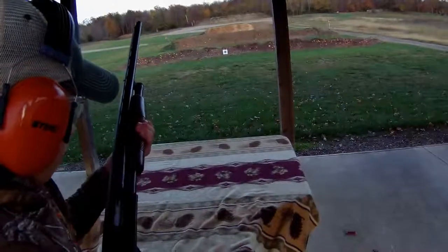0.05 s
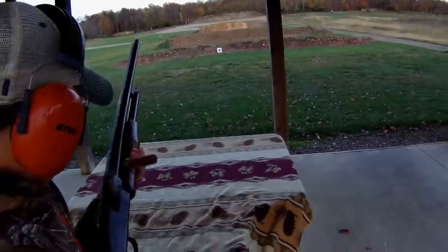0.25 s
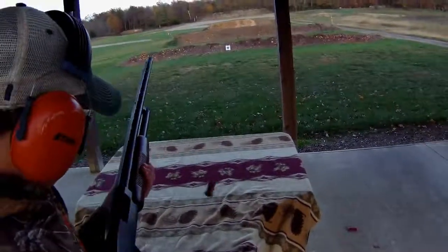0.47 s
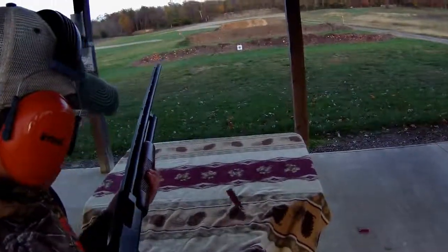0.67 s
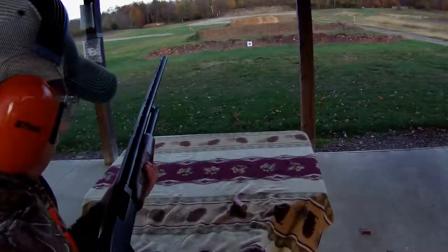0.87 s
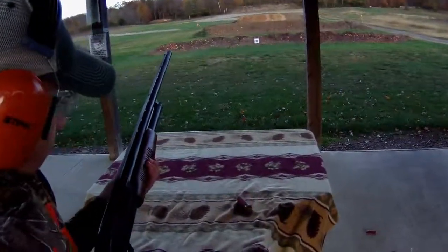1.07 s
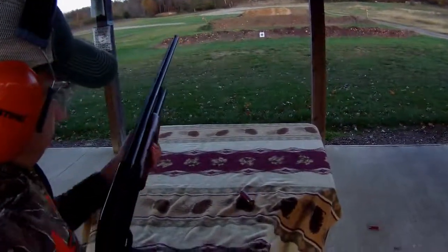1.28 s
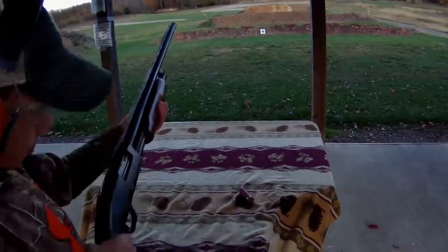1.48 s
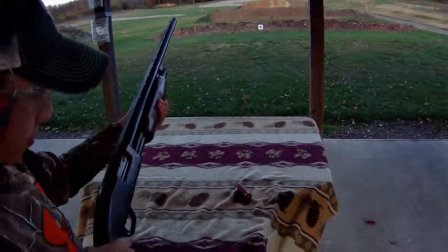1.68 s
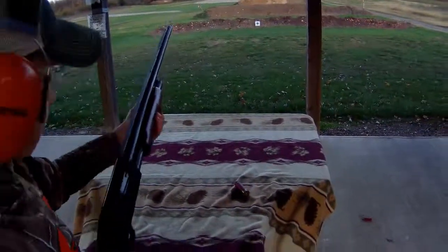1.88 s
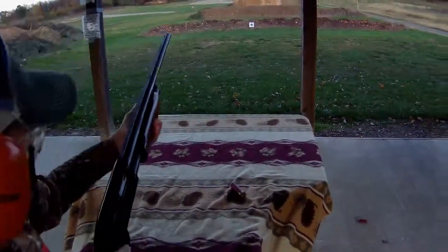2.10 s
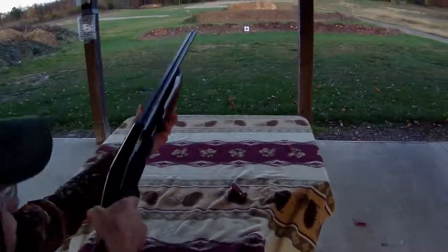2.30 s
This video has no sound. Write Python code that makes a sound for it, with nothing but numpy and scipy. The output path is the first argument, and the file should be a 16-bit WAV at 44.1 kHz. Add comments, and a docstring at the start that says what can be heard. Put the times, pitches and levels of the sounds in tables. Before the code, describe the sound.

A pump shotgun is racked open close by, with a steel scrape and ringing clacks at about 0.25 seconds. The spent shell thuds softly on a cloth-covered table at 0.4, then bounces with hollow plastic clicks at 0.6 and 0.85. After a quiet pause, the action slams shut at 1.5 seconds. Right after, a dull boom, perhaps a distant shot, rolls away in uneven echoes until about 2.3.

```python
"""Under the roof of an outdoor range, in quiet air, a pump shotgun is racked open: steel scrapes,
knocks and rings, and the stock thumps. The spent shell thuds on a cloth-covered table, then a hollow
plastic hull bounces twice with a click and a pop. At 1.5 s the action slams shut. Just after, a dull
boom, perhaps a far shot, reaches the microphone, rings the shelter and rolls away in uneven echoes."""
import sys
import numpy as np
from scipy import signal
from scipy.fft import rfft, irfft
from scipy.io import wavfile

SR = 44100
rng = np.random.default_rng(int(sys.argv[2]) if len(sys.argv) > 2 else 0)


def unload_audio(sound):
    """Save the sound as a 16-bit wav file, at the path given as the first command line argument."""
    columns = np.transpose(np.atleast_2d(sound))
    # keep every value between -1 and 1, then stretch to whole-number steps
    steps = np.round(np.clip(columns, -1, 1) * 32767)
    wavfile.write(sys.argv[1], SR, steps.astype(np.int16))


N = 108045

# Tone colours. Each row: frequency in Hz, relative level in dB.
AIR_COLOUR = [(25, -5.5), (45, 1), (85, 1), (130, -9.5), (220, -8), (400, -12.5), (650, -15.5),
              (1100, -18.5), (1700, -30), (3200, -35), (6300, -39), (15000, -41.5)]
PULSE_COLOUR = [(30, -13.5), (100, -21), (180, 0), (500, -2.5), (1000, -4), (2000, -31), (5000, -32),
                (16000, -67.5)]
RUMBLE_COLOUR = [(30, -54), (70, -24.5), (120, -7.5), (175, -5), (280, 1.5), (400, 1), (600, -1.5),
                 (900, -9.5), (1200, -18.5), (2000, -31.5), (5000, -65)]
RUMBLE_TREBLE_COLOUR = [(200, -13.5), (700, 8), (1350, 4), (2000, -7), (2700, -10.5), (3600, -8.5),
                        (5200, -28.5), (7000, -29.5), (9500, -33.5), (13000, -44.5), (16000, -42.5)]
RUMBLE_BASS_COLOUR = [(40, -26), (85, -10), (130, -12), (185, 2), (215, -3), (300, -6), (450, -11.5),
                      (1000, -36), (3000, -61)]
RASP_COLOUR = [(400, -26), (900, 12), (1350, 8.5), (1800, -7), (2400, -5.5), (3000, -31), (8000, -54)]
CLOTH_COLOUR = [(40, -31), (100, -10.5), (150, 1), (210, -2.5), (380, -3), (550, -10.5), (800, -15),
                (1500, -30), (4000, -49.5)]
HULL_CLICK_COLOUR = [(300, -39), (1500, 14), (2500, -2), (3600, 7), (4300, 0), (5500, -12.5), (6400, -5),
                     (8300, -27), (10000, -44.5), (16000, -50)]
SIZZLE_COLOUR = [(3000, -30), (7000, -7.5), (9500, 1), (11500, -4), (13300, 1.5), (16000, -6)]
SLIDE_COLOUR = [(200, -11.5), (700, 9), (1500, 7), (2500, -0.5), (3600, 1), (5000, -10.5), (6700, -11.5),
                (9000, -28), (13500, -36), (16000, -31.5)]
KNOCK_COLOUR = [(100, -25.5), (300, -15.5), (480, -3), (1000, -4), (1900, -1), (2600, -16), (6000, -35),
                (16000, -57)]
RING_COLOUR = [(200, -25), (900, -4), (1800, 2), (2500, 3), (3400, 5.5), (4500, -13), (8000, -24.5),
               (16000, -29.5)]
TICK_COLOUR = [(500, -23), (2500, -1.5), (4000, 0), (5500, -4), (6600, 2.5), (7800, -0.5), (9200, -27),
               (13300, -22), (16000, -32.5)]
# The clacks with their bass and highest treble turned down. Each row: frequency in Hz, gain in dB.
GUN_TONE = [(60, -24), (200, -20), (420, -4.5), (8000, 0), (9500, -13), (16000, -17)]

# Swells and fades. Each row: time in seconds, level in dB.
RUMBLE_LEVEL = [(1.508, -43), (1.518, -21.5), (1.55, -23.5), (1.6, -30), (1.71, -33), (1.74, -27.5),
                (1.79, -27.5), (1.835, -39), (1.86, -31), (1.94, -26), (2.03, -30.5), (2.055, -24),
                (2.1, -30), (2.2, -34.5), (2.3, -50.5), (2.45, -70)]
RUMBLE_TREBLE_LEVEL = [(1.5, -46), (1.53, -29), (1.62, -53.5), (1.718, -46), (1.724, -25), (1.752, -28),
                       (1.762, -33.5), (1.847, -51), (1.853, -38.5), (1.87, -43), (1.92, -47),
                       (2.033, -56.5), (2.041, -34), (2.1, -43.5), (2.22, -62), (2.25, -62), (2.3, -59.5),
                       (2.45, -63)]
RUMBLE_BASS_LEVEL = [(1.52, -48), (1.66, -35), (1.8, -35), (1.95, -40), (2.12, -36.5), (2.19, -31.5),
                     (2.3, -40), (2.45, -62)]
RASP_LEVEL = [(1.91, -68), (1.933, -32.5), (1.955, -36.5), (1.99, -48), (2.03, -79)]
CLOTH_LEVEL = [(0, -55), (.1, -57.5), (.2, -47.5), (.385, -51), (.395, -45.5), (.415, -36.5), (.435, -36),
               (.47, -42), (.53, -45.5), (.55, -53.5), (.7, -72.5), (1.26, -77), (1.288, -48),
               (1.35, -44.5), (1.39, -48), (1.48, -56), (1.55, -68)]
SLIDE_LEVEL = [(0, -67), (.13, -66.5), (.16, -43), (.18, -48), (.215, -38.5), (.25, -31.5), (.29, -36.5),
               (.33, -55.5), (.5, -67.5), (1.3, -90.5), (1.37, -52), (1.42, -45), (1.46, -42), (1.5, -31),
               (1.56, -64.5)]

# Resonances. Each row: frequency in Hz, relative level in dB, t60 in seconds.
SHELTER_MODES = [(178, -2, 0.39), (262, -3, 0.22), (296, -4, 0.25), (364, -6, 0.2), (400, -1.5, .15),
                 (478, -4, 0.16), (753, -1, .22), (834, -3, 0.18)]
HULL_MODES = [(577.7, -24.5, 0.27), (1061, -26, 0.5), (1255, 2, .03), (1190, -29, 0.15), (1440, -11, .025)]
STOCK_MODES = [(212, -3.5, .14), (335, -1.5, .045)]
SMALL_PART_MODES = [(4520, -8.5, 0.025), (5960, -4.5, 0.013), (6380, -4, .045), (6640, -1.5, 0.04),
                    (6800, 0, 0.022), (7300, -11, 0.013)]
# Receiver and barrel. Each row: frequency in Hz, level in dB with the breech open, level in dB
# with it shut, t60 in seconds.
STEEL_MODES = [(410, -14, -20, 0.046), (540, -5.5, -23, .08), (756, -17.5, -23.5, 0.021),
               (960, -9, -20.5, 0.045), (1232, -7.5, -16, 0.07), (1290, -4, -7.5, 0.12),
               (1506, -7.5, -24, .1), (1578, -18, -7, 0.083), (1634, -11, -24, 0.1), (1933, -6, -9, 0.062),
               (2054, -4, -11.5, 0.08), (2322, -20.5, -6, 0.035), (2925, -8.5, -3.5, .045),
               (3073, -9.5, -2.5, 0.067), (3240, -11.5, -18, 0.1), (3416, -10.5, -4, 0.06),
               (3650, -10.5, -10, 0.05)]
# Reverberation under the roof. Each row: band centre in Hz, level in dB, t60 in seconds.
ROOF_BANDS = [(149, -7.5, .6), (500, -8, 0.3), (1290, -16, 0.14), (2400, -13, 0.12), (3480, -6.5, 0.2),
              (6500, -12.5, 0.21), (8700, -7.5, 0.17), (14000, -7, 0.2)]

# The boom and its clearest echoes. Each row: start in seconds, level in dB, length in seconds.
BOOM_PULSES = [(1.5087, -4.5, 0.0024), (1.5171, -6.5, 0.0022), (1.5212, -11, 0.00095),
               (1.5259, -9.5, 0.0019), (1.5393, -9.5, 0.00173), (1.5485, -8, 0.0012),
               (1.5564, -9.5, 0.0013), (1.5642, -11.5, .0014), (1.588, -13.5, 0.0021),
               (1.734, -6.5, 0.0016), (1.8536, -13, 0.0025), (2.038, -8.5, 0.00283), (2.057, -8.5, 0.0025)]
# The hull landing. Each row: start in seconds, pop level in dB, click level in dB.
HULL_BOUNCES = [(0.6308, -23.5, -24), (.636, -38, -45), (0.6453, -62, -44), (.8552, -31, -47)]
# Bursts of fine, bright hiss. Each row: start in seconds, level in dB, t60 in seconds.
SIZZLE_BURSTS = [(0.247, -43, 0.31), (.2705, -35.5, .03), (.413, -60, 0.024), (.4215, -57, .03),
                 (1.364, -60, 0.014), (1.3748, -57, 0.033), (1.384, -51, 0.03), (1.493, -41.5, .17),
                 (2.246, -60, .05)]
# The fore-end hitting its stops. Each row: start in seconds, level in dB.
FORE_END_STOPS = [(0.2428, -33), (1.4883, -25)]
# Contacts in the action. Each row: start in seconds, knock pitch in Hz, then the levels in dB
# of the body's knock, the steel's ring and the bright tick.
CONTACTS = [(0.0375, 1080, -43, -45, -54), (.078, 1070, -50, -63.5, -69), (0.1448, 1430, -34, -38, -38.5),
            (.1552, 1380, -32.5, -27.5, -22), (0.19, 1350, -36, -34, -35),
            (0.2024, 1070, -21, -23.5, -26.5), (0.2288, 1140, -14.5, -17.5, -1),
            (.2318, 1350, -4.5, -19, -18), (0.2351, 1047, -1, -5.5, -35), (0.2366, 1204, -12, -17, -6),
            (.2432, 1190, -15, -18.5, -18), (.2615, 1400, -23.5, -21.5, -31),
            (.2705, 850, -32.5, -24.5, -25), (0.2766, 1420, -25, -14, -32), (.2935, 1480, -32, -50, -50),
            (0.3, 1700, -25, -53, -50), (.339, 1400, -37, -37, -50), (0.3615, 1410, -41, -52, -44),
            (0.3914, 1040, -38.5, -50.5, -53), (.413, 1346, -38, -43, -45.5), (0.4207, 1447, -46, -34, -42),
            (1.3437, 1390, -50, -53, -60), (1.3633, 1395, -48.5, -42.5, -43.5),
            (1.3748, 1400, -50, -40, -43), (1.3795, 1400, -39.5, -36.5, -46), (1.4137, 1450, -31, -22, -30),
            (1.4728, 1390, -28, -13.5, -17), (1.4833, 1335, -7, -16, -22), (1.4883, 1309, -6, -2.5, -11),
            (1.4908, 1670, -26, -14, -14), (1.502, 1330, -30, -23.5, -35), (2.238, 1410, -63, -37, -54.5),
            (2.246, 1390, -50, -31, -42.5), (2.254, 1415, -51, -48, -51)]


def amp(db):
    """Decibels to gain."""
    return 10 ** (np.asarray(db) / 20)


def unit(x):
    """Scale to rms 1."""
    return x / np.sqrt(np.mean(x ** 2))


def clock():
    """Time of every sample."""
    return np.arange(N) / SR


def fade(t60):
    """Exponential decay."""
    return np.exp(-np.log(1000) * clock() / max(t60, 1 / SR))


def curve(points):
    """Gain over time from (s, dB) points, silent outside them."""
    return amp(np.interp(clock(), *np.array(points).T, left=-np.inf, right=-np.inf))


def through(x, response):
    """Sound passed through an impulse response."""
    return signal.fftconvolve(x, response)[:N]


def colour(x, points, size=4096):
    """Causal filter with the given (Hz, dB) shape."""
    hz, db = np.array(points)[:, :2].T
    bins = np.maximum(np.arange(size // 2 + 1), 1) * SR / size
    cep = irfft(np.log(amp(np.interp(np.log(bins), np.log(hz), db))))
    cep[1:size // 2] *= 2
    cep[size // 2 + 1:] = 0
    return through(x, irfft(np.exp(rfft(cep))))


def noise(points):
    """Coloured noise of rms 1."""
    return unit(colour(rng.standard_normal(N), points))


def grains(per_s, spread_db):
    """Random clicks of uneven size."""
    return (rng.random(N) < per_s / SR) * rng.choice([-1, 1], N) * amp(spread_db * rng.standard_normal(N))


def ring(modes, size=N):
    """Sum of damped modes, neighbours in opposite phase."""
    t = clock()[:size]
    return sum((-1) ** k * amp(db) * np.exp(-np.log(1000) * t / t60) * np.sin(2 * np.pi * hz * t)
               for k, (hz, db, t60) in enumerate(modes))


def add(out, at, x):
    """Mix a sound in at a time."""
    i = max(int(at * SR), 0)
    n = min(len(x), N - i)
    out[i:i + n] += x[:n]


def open_air():
    """Quiet air around the microphone, mostly bass."""
    return amp(-56.5) * noise(AIR_COLOUR)


def roof(sound, delay_s=.003, build_s=.005):
    """Close reflections from roof, posts and slab, each band dying at its own rate."""
    centres = np.array(ROOF_BANDS)[:, 0]
    spectrum = rfft(unit(grains(per_s=6200, spread_db=4.5)))
    log_hz = np.log(np.maximum(np.arange(len(spectrum)), 1) * SR / N)
    tail = 0
    for share, (_, db, t60) in zip(np.eye(len(centres)), ROOF_BANDS):
        band = irfft(spectrum * np.interp(log_hz, np.log(centres), share), N)
        equal_energy = np.sqrt(2 * np.log(1000) / (t60 * SR))
        tail = tail + amp(db) * band * fade(t60) * equal_energy
    onset = np.clip((clock() - delay_s) / build_s, 0, 1)
    return through(sound, tail * onset)


def boom():
    """From far off, N-shaped pressure pulses and a swarm of scattered echoes ring the shelter."""
    pulses = np.zeros(N)
    for at, db, length in BOOM_PULSES:
        add(pulses, at, amp(db) * np.linspace(1, -1, max(int(length * SR), 2)))
    echoes = unit(colour(grains(per_s=1500, spread_db=1.5), RUMBLE_COLOUR))
    low = colour(pulses, PULSE_COLOUR) + curve(RUMBLE_LEVEL) * echoes
    shelter = amp(-57.5) * through(low, ring(SHELTER_MODES))
    bright_echoes = unit(colour(grains(per_s=4000, spread_db=-2.0), RUMBLE_TREBLE_COLOUR))
    treble = curve(RUMBLE_TREBLE_LEVEL) * bright_echoes
    lingering_bass = curve(RUMBLE_BASS_LEVEL) * noise(RUMBLE_BASS_COLOUR)
    return low + shelter + treble + lingering_bass


def rasp():
    """A short, grainy swell in the middle of the rumble."""
    return curve(RASP_LEVEL) * unit(colour(grains(per_s=3500, spread_db=4.0), RASP_COLOUR))


def cloth():
    """Muffled patter of the shell on the covered table and of hands on the gun."""
    return curve(CLOTH_LEVEL) * unit(colour(grains(per_s=2500, spread_db=0), CLOTH_COLOUR))


def hull(pop_echo_db=7.5, click_echo_db=10.5):
    """The empty hull clicks and its air column pops at each bounce; both echo under the roof."""
    pops, clicks = np.zeros(N), np.zeros(N)
    for at, pop_db, click_db in HULL_BOUNCES:
        add(pops, at, amp(pop_db) * ring(HULL_MODES))
        add(clicks, at, amp(click_db) * noise(HULL_CLICK_COLOUR) * fade(t60=.014))
    return pops + clicks + roof(amp(pop_echo_db) * pops + amp(click_echo_db) * clicks)


def sizzle():
    """A fine, bright hiss that fades just after a clack or click."""
    out = np.zeros(N)
    for at, db, t60 in SIZZLE_BURSTS:
        hiss = unit(colour(grains(per_s=5000, spread_db=4.0), SIZZLE_COLOUR))
        add(out, at, amp(db) * fade(t60) * hiss)
    return out


def stock():
    """The fore-end shakes the stock with a thump at each end of the stroke."""
    out = np.zeros(N)
    for at, db in FORE_END_STOPS:
        add(out, at, amp(db) * ring(STOCK_MODES))
    return out


def slide():
    """The fore-end scrapes along the magazine tube, steel on steel, in tiny catches."""
    catches = grains(per_s=1200, spread_db=4)
    return curve(SLIDE_LEVEL) * unit(colour(catches, SLIDE_COLOUR))


def action(size=8192, shut_modes_from_s=1.0, strike_spread_db=3):
    """Each contact knocks the body, rings the steel and ticks the small parts, each with a crack."""
    out, t = np.zeros(N), clock()[:size]
    small_parts = amp(-16.5) * ring(SMALL_PART_MODES, size)
    crack_decay, knock_decay = fade(t60=.026)[:size], fade(t60=.025)[:size]
    noises = np.array([amp(-6.5) * noise(KNOCK_COLOUR),
                       amp(-9.5) * noise(RING_COLOUR),
                       amp(-12.5) * noise(TICK_COLOUR)])
    # Every contact has its own mix of modes and its own stretch of noise.
    mixes = strike_spread_db * rng.uniform(-1, 1, (len(CONTACTS), len(STEEL_MODES)))
    offsets = rng.integers(0, N - size, len(CONTACTS))
    for (at, knock_hz, knock_db, ring_db, tick_db), mix, i in zip(CONTACTS, mixes, offsets):
        knock_crack, ring_crack, tick_crack = noises[:, i:i + size] * crack_decay
        modes = [(hz, (open_db if at < shut_modes_from_s else shut_db) + mix_db, t60)
                 for (hz, open_db, shut_db, t60), mix_db in zip(STEEL_MODES, mix)]
        knock = knock_decay * np.sin(2 * np.pi * knock_hz * t) + knock_crack
        steel = amp(-11.5) * ring(modes, size) + ring_crack
        tick = small_parts + tick_crack
        add(out, at, amp(knock_db) * knock + amp(ring_db) * steel + amp(tick_db) * tick)
    return out


def scene():
    """One microphone under the roof: gun, table and hull nearby, the boom and open air beyond."""
    gun = colour(action(), GUN_TONE) + stock() + slide()
    nearby = gun + roof(gun) + sizzle() + hull() + cloth()
    return (nearby + boom() + rasp() + open_air())[None]


def record(dry):
    """The recorder rounds the loudest peaks and cuts the top."""
    ceiling, top_hz = .85, 15700
    rounded = dry / (1 + (dry / ceiling) ** 4) ** .25
    lowpass = signal.ellip(10, .2, 80, top_hz, fs=SR, output="sos")
    return signal.sosfilt(lowpass, rounded)


dry = scene()
out = record(dry)
unload_audio(out)
```